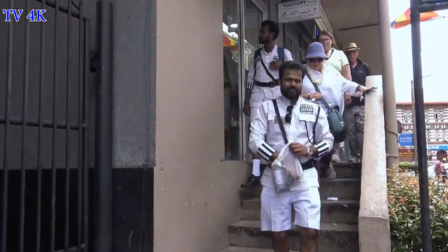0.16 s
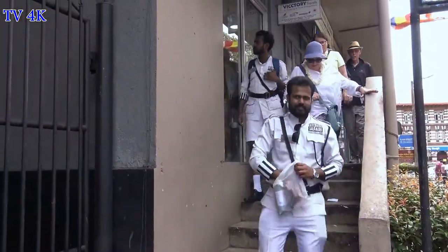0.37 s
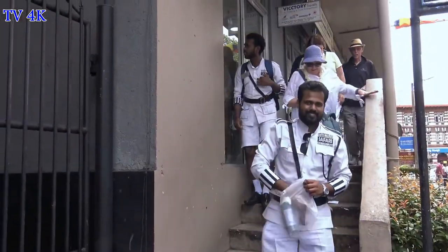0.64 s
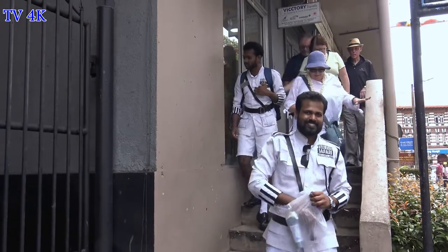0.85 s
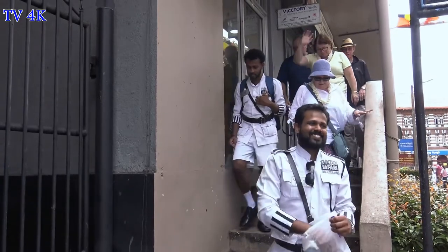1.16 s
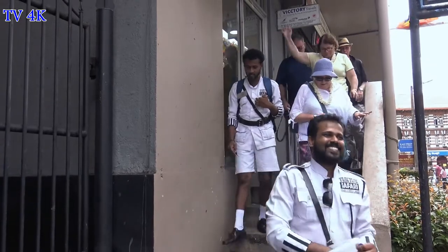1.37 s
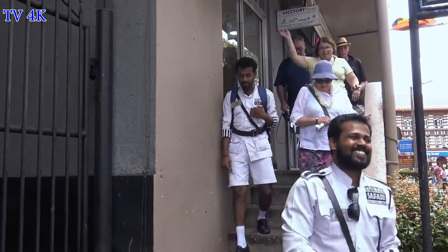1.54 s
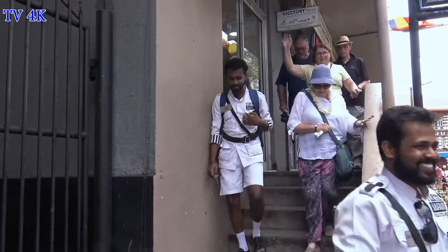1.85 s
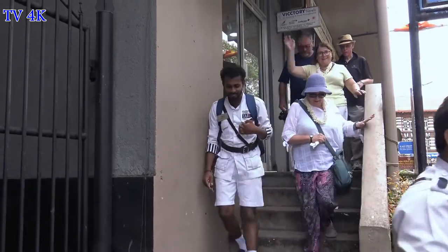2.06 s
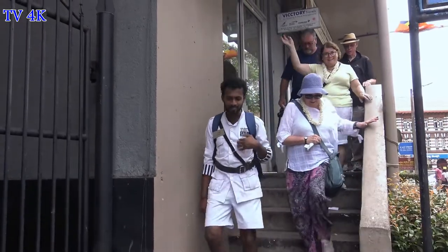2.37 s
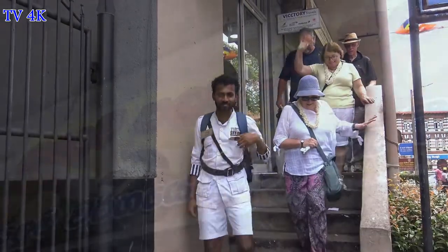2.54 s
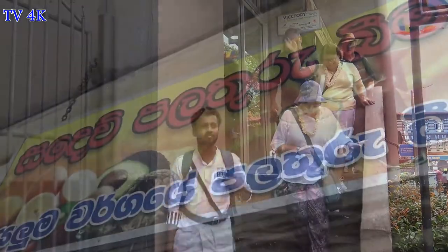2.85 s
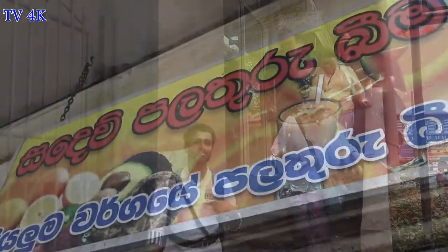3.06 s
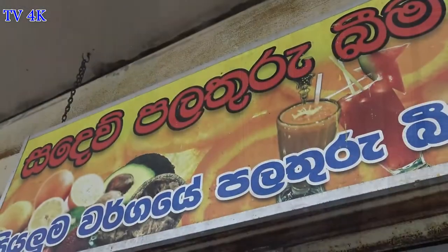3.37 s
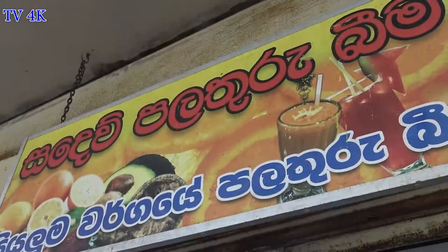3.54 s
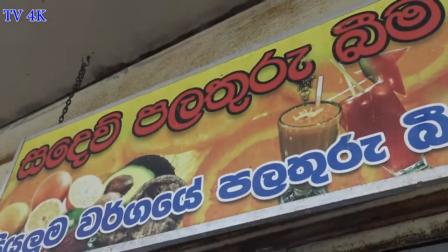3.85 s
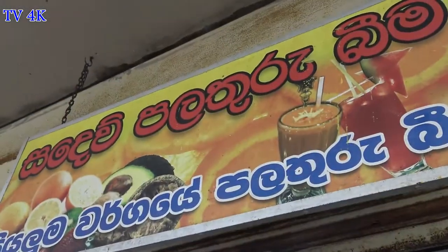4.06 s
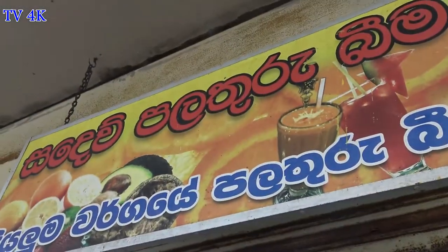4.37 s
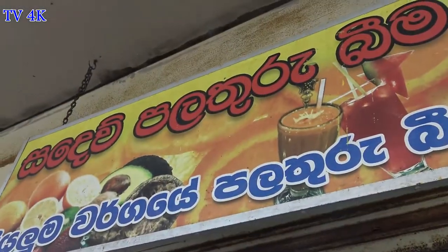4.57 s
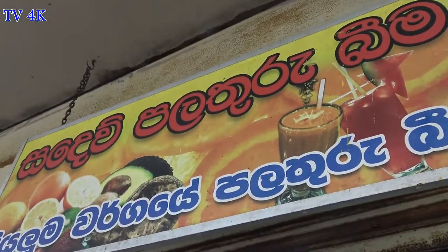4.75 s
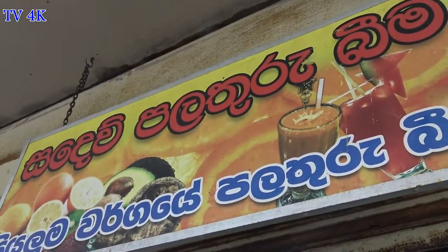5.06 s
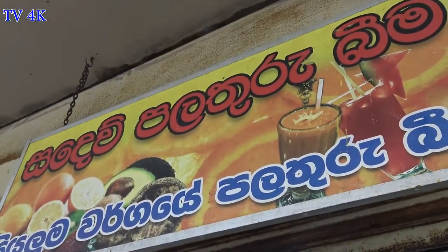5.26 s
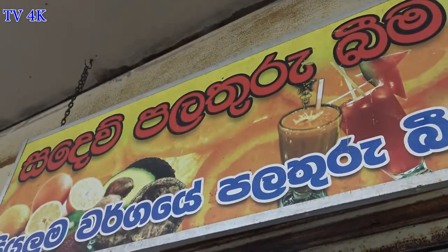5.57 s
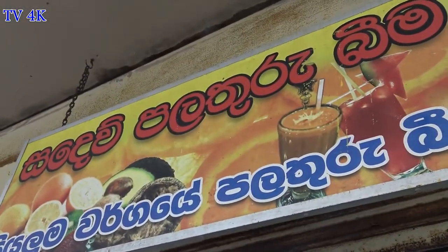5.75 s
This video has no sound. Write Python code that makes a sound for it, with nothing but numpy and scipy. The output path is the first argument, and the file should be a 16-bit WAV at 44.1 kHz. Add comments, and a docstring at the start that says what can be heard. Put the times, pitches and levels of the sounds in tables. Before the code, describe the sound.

Street ambience dominated by one low, booming small engine: stumbling at first, quickly accelerating into fast dull thuds, coasting down after about three seconds, idling weakly, then revving and easing. Late on, another small motor ticks drily at right with a faint rough rising whine. Traffic is a wide, quiet wash in open air, picked up by two spaced microphones.

```python
"""A single-cylinder three-wheeler booms in street traffic while brakes squeal briefly and faintly.
It pulls away, coasts, idles and revs again; each firing rings its silencer as a short tone burst.
Traffic and the rasp of the engine casing are shaped noise, partly alike at two spaced microphones.
Later a second small engine ticks past on the right, made of noise bursts and ringing knocks.
A rough whine climbs as an unsteady tone."""
import sys
import numpy as np
from scipy import signal
from scipy.fft import rfft, irfft, next_fast_len
from scipy.io import wavfile
from scipy.ndimage import uniform_filter1d, map_coordinates

SR = 44100
rng = np.random.default_rng(int(sys.argv[2]) if len(sys.argv) > 2 else 0)


def persist_wave(psi):
    """Save psi, clipped to +-1, as 16-bit WAV."""
    counts = np.round(np.clip(psi, -1, 1) * 32767).astype(np.int16)
    wavfile.write(sys.argv[1], SR, np.atleast_2d(counts).T)


N = 260631  # length in samples


def amp(db):
    """Turn dB into an amplitude factor."""
    return 10 ** (np.asarray(db) / 20)


def unit(x):
    """Scale a signal to an rms of 1."""
    return x / np.sqrt(np.mean(x ** 2) + 1e-20)


def along(points, hz):
    """Read a curve of (Hz, value) points on a log frequency axis."""
    f, v = np.transpose(points)
    return np.interp(np.log(hz + 1), np.log(f + 1), v)


def spectrum(points):
    """A filter whose gain follows (Hz, dB) points."""
    return lambda hz: amp(along(points, hz))


def curves(rows, at=None):
    """Each column after the time, at every sample or at given times."""
    seconds, *columns = np.transpose(rows)
    when = np.arange(N) / SR if at is None else at
    return [np.interp(when, seconds, column) for column in columns]


def wobble(rate):
    """A smooth random curve with `rate` random points a second."""
    knots = rng.standard_normal(int(N * rate / SR) + 4)
    return map_coordinates(knots, [np.arange(N) * rate / SR])


def filtered(x, response):
    """Multiply the spectrum of x by a complex response of frequency."""
    m = next_fast_len(N + SR // 2)
    return irfft(rfft(x, m) * response(np.fft.rfftfreq(m, 1 / SR)), m)[..., :N]


def modes(rows):
    """A filter of a few resonances, given as (Hz, width Hz, dB), with alternating sign."""
    def response(f):
        total = 0
        for k, (centre, width, db) in enumerate(rows):
            damping = 1j * f * width
            total = total + (-1) ** k * amp(db) * damping / (centre ** 2 - f ** 2 + damping)
        return total
    return response


# How alike left and right are. Each row: frequency in Hz, likeness from 0 to 1.
LIKENESS = [(60, 0.97), (260, 0.92), (530, 0.74), (1100, 0.3), (2200, 0.23), (5000, 0.08), (10000, 0.04)]
# How the sound leans to one side. Each row: frequency in Hz, left minus right in dB.
SIDE_LEAN = [(30, .5), (190, 0), (330, 1), (600, 2), (1000, 0), (1800, 2), (3100, -1), (5400, -0.5),
             (8500, -11.5), (10500, -3), (12500, 3)]
LAG_S = 10 / 44100  # the left microphone hears the treble this much later


def spaced(colour, patchy_db):
    """Patchy noise of rms 1 at two microphones: treble less alike, late on the left, mostly leaning right."""
    # random patches in time and frequency are louder or softer
    z = signal.stft(rng.standard_normal((2, N)), nperseg=512)[2]
    patches = uniform_filter1d(rng.standard_normal(z.shape[1:]), 6, 0)
    patches = uniform_filter1d(patches, 10, 1)
    pair = signal.istft(z * amp(patchy_db * unit(patches)), nperseg=512)[1][:, :N]

    # mix a shared and an opposed noise so that the two sides are as alike as the table asks
    def share(hz):
        angle = np.arccos(np.clip(along(LIKENESS, hz), -1, 1)) / 2
        return colour(hz) * np.array([np.cos(angle), np.sin(angle)])

    mid, side = filtered(pair, share)
    ear = np.array([[1], [-1]])  # left, right

    def placing(hz):
        treble_only = 1 / (1 + (1300 / (hz + 1)) ** 4)
        delay = np.exp(-1j * np.pi * hz * LAG_S * ear * treble_only)
        return amp(ear * along(SIDE_LEAN, hz) / 2) * delay

    return unit(filtered(np.array([mid + side, mid - side]), placing))


# Speed of the three-wheeler's engine. Each row: time in seconds, firings per second.
ENGINE_SPEED = [(0.0, 11.39), (0.2, 13.38), (0.42, 9.95), (0.55, 16.49), (0.7, 19.43), (0.85, 23.15),
                (0.97, 19.01), (1.15, 19.14), (1.4, 19.43), (1.62, 19.26), (1.75, 20.1), (2.0, 20.31),
                (2.2, 21.18), (2.45, 21.83), (2.66, 22.22), (2.8, 19.87), (2.95, 17.99), (3.15, 14.3),
                (3.4, 14.17), (3.52, 17.07), (3.68, 10.13), (4.0, 10.35), (4.3, 9.41), (4.5, 9.12),
                (4.62, 9.59), (4.8, 17.11), (4.95, 19.12), (5.1, 19.91), (5.25, 16.15), (5.42, 13.99),
                (5.55, 12.69), (5.66, 16.07), (5.91, 17.61)]
CRANK_START = .262  # firings already counted at 0 s


def firings():
    """The moments at which the running count of firings passes whole numbers."""
    count = CRANK_START + np.cumsum(curves(ENGINE_SPEED)[0]) / SR
    return np.interp(np.arange(1, int(count[-1]) + 1), count, np.arange(N) / SR)


def blend(shut, wide, throttle):
    """A value between its shut-throttle and open-throttle ends."""
    return shut + (wide - shut) * np.clip(throttle, 0, 1)


def puffs(times, hz, ring_s, size, turn=2.7):
    """One tone burst a firing that swells to its peak at the given time and fades; size is its root energy."""
    t = np.arange(-SR // 12, SR // 12) / SR
    spread = ring_s[:, None] * np.where(t < 0, 1.7, 1.45)  # build-up and decay
    swell = np.exp(-.5 * (t / spread) ** 2) * np.hanning(len(t)) ** .5
    burst = swell * np.cos(2 * np.pi * hz[:, None] * t + np.reshape(turn, (-1, 1)))
    burst *= (size / np.linalg.norm(burst, axis=1))[:, None]
    # add the bursts up, with spare room at both ends
    at = (times * SR).astype(int)[:, None] + SR - SR // 12 + np.arange(len(t))
    return np.bincount(at.ravel(), burst.ravel(), N + 3 * SR)[SR:SR + N]


def even_size(times):
    """Slower firing makes bigger puffs, which keeps one average level."""
    return np.sqrt(np.gradient(times) * SR)


# Resonances of the tail pipe. Each row: pitch in Hz before scatter, share of the ring time,
# level in dB, delay in seconds.
TAIL_PIPE_MODES = [(169, 1.3, -4, 0.00034), (200, 0.5, -12, 0.00018), (132, 1.1, -13, .0003)]
PIPE_DB, POP_DB = -17.5, 1  # level against the boom; extra with the throttle shut
# extra gain near the firing rate (per s) that suits the pipe, and how far either side it spreads
PIPE_TUNED_DB, PIPE_TUNED_RATE, PIPE_TUNED_SPREAD = 8.5, 22.14, 1.84
PIPE_IDLE_DB = 6  # the pipe fades as the engine slows: this is the loss towards standstill


def tail_pipe(peak, rate, throttle, ring_s, size, chance):
    """Each firing also rings the tail pipe, most strongly when the firing rate suits it."""
    tuned = np.exp(-.5 * ((rate - PIPE_TUNED_RATE) / PIPE_TUNED_SPREAD) ** 2)
    pipe_db = PIPE_DB + POP_DB * (1 - throttle) + PIPE_TUNED_DB * tuned
    pipe_db = pipe_db - PIPE_IDLE_DB * np.clip(1 - rate / 19, 0, 1) + 5.5 * chance[:, 4]
    out = 0
    for hz, share, db, late_s in TAIL_PIPE_MODES:
        scattered_hz = hz * (1 + .22 * chance[:, 3])
        out = out + puffs(peak + late_s, scattered_hz, share * ring_s, size * amp(pipe_db + db))
    return out


# The driver's throttle and the boom it gives. Each row: time in seconds, boom level in dB before scatter,
# throttle from 0 to 1, boom pitch in Hz before scatter.
THROTTLE_AND_BOOM = [(0, -21, .3, 62), (.07, -22, .1, 67), (.3, -24.5, 0.14, 72), (.48, -20.5, 0.15, 80),
                     (.56, -15.5, 0.8, 84), (.62, -18, 0.75, 95), (.8, -19.5, 0.91, 100.9),
                     (.95, -17.5, 0.86, 92.2), (1.3, -14.5, 0.96, 91.2), (1.6, -15.5, 0.83, 90),
                     (1.7, -12.5, 0.9, 93.2), (1.95, -13.5, 0.93, 90.8), (2.4, -15, 0.96, 102.8),
                     (2.725, -17, 0.74, 100), (2.76, -15, .25, 80), (2.87, -15, .25, 80),
                     (3.0, -19, .2, 73), (3.12, -21, .25, 70), (3.45, -23.5, 0.1, 79),
                     (3.58, -21, 0.33, 74.6), (3.7, -26, 0.25, 70), (4.5, -25.5, 0, 73.5),
                     (4.66, -21, .1, 82), (4.74, -16, 0.6, 77), (4.81, -20, 0.9, 98), (5.08, -14.5, 1, 96),
                     (5.2, -17, 0.64, 81), (5.3, -18.5, 0.2, 69.5), (5.37, -20.5, 0.35, 86),
                     (5.45, -21, 0.27, 74), (5.62, -14, 0.8, 81.5), (5.72, -20.5, .6, 88),
                     (5.91, -18.5, 0.6, 86)]
# Weak firings as the engine stumbles. Each row: time in seconds, loss of the nearest firing in dB.
WEAK_FIRINGS = [(.15, 10), (.39, 2), (2.926, 6.5), (3.175, 2), (3.31, 4), (3.51, 10), (3.65, 1), (3.745, 3),
                (4.04, 14), (4.235, 8), (4.56, 16), (5.12, 11), (5.44, 2.5), (5.495, 3)]
IDLE_RING_S, LOADED_RING_S = .0052, .0098  # basic burst width, scaled later for build-up and decay
IDLE_UNEVEN, LOADED_UNEVEN = .28, .11  # how strongly firings differ, scaling all the scatter
SCATTER_DB = 5  # size scatter for an unevenness of 1
# where in its swing the boom peaks (radians): suction first when shut, pressure first under load
IDLE_TURN, LOADED_TURN = -1.0, -3.58
CHAMBER_DB = -12  # a deeper chamber, against the boom
# off load and below this firing rate (per s), a weaker puff follows each firing
AFTER_S, AFTER_DB, AFTER_BELOW_RATE = .026, -6, 21


def exhaust(times):
    """Each firing rings the silencer and tail pipe; uneven burning scatters time, size and pitch."""
    boom_db, throttle, hz = curves(THROTTLE_AND_BOOM, times)
    rate, = curves(ENGINE_SPEED, times)
    ring_s = blend(IDLE_RING_S, LOADED_RING_S, throttle)
    load = np.clip(throttle, 0, 1)
    uneven = blend(IDLE_UNEVEN, LOADED_UNEVEN, 1 - (1 - load) ** 3)
    chance = rng.standard_normal((len(times), 5)) * uneven[:, None]
    for s, loss_db in WEAK_FIRINGS:
        boom_db[np.argmin(abs(times - s))] -= loss_db
    size = amp(boom_db + SCATTER_DB * chance[:, 0]) * even_size(times)
    turn = blend(IDLE_TURN, LOADED_TURN, load ** 3)
    peak = times + .0034 + .005 * chance[:, 1]

    boom = puffs(peak, hz * (1 + .14 * chance[:, 2]), ring_s, size, turn)
    chamber = puffs(peak + .0045, .62 * hz, .8 * ring_s, size * amp(CHAMBER_DB), turn)
    pipe = tail_pipe(peak, rate, throttle, ring_s, size, chance)

    after_peak = peak + AFTER_S * (1 + chance[:, 4])
    after_hz = hz * (1 + .32 * chance[:, 3])
    after_share = np.clip((1 - throttle) * (AFTER_BELOW_RATE - rate) / 6, 0, 1)
    after = puffs(after_peak, after_hz, 1.46 * ring_s, size * amp(AFTER_DB) * after_share, turn)
    return boom + chamber + after + pipe


# Level of the traffic rumble. Each row: time in seconds, level in dB before its wobble.
RUMBLE_LEVEL = [(0, -22), (.6, -24.5), (.9, -29), (1.5, -30), (2.6, -30.5), (3.0, -22), (3.35, -24),
                (3.7, -26.5), (4.6, -24.5), (5.0, -24), (5.91, -22)]
# Tone colour of the rumble. Each row: frequency in Hz, relative level in dB per Hz.
RUMBLE_COLOUR = [(8, -16), (22, -5.5), (33, 0.5), (52, -2), (75, -4), (110, -3.5), (200, -33), (400, -89)]


def traffic_rumble():
    """Deep noise from the traffic, with a slowly wobbling level."""
    level = amp(curves(RUMBLE_LEVEL)[0] + 2.3 * wobble(6.7))
    return level * spaced(spectrum(RUMBLE_COLOUR), patchy_db=2.5)


# Level of the traffic. Each row: time in seconds, roar level and tyre hiss level in dB before their wobble.
TRAFFIC_LEVEL = [(0, -40.5, -50), (.1, -39, -51), (.23, -37.5, -52), (.3, -44, -52.5), (.6, -39.5, -52),
                 (.8, -39, -51), (.87, -38, -45), (.93, -39, -51), (1.2, -40, -53), (1.6, -40.5, -50.5),
                 (1.9, -37.5, -54), (2.6, -38, -47.5), (3.0, -44.5, -51.5), (3.25, -40.5, -48),
                 (3.4, -39.5, -49.5), (3.6, -43.5, -49), (4.55, -42, -48), (4.68, -36, -46.5),
                 (5.35, -40, -49), (5.6, -38, -53), (5.91, -43.5, -50.5)]
# Tone colour of the roar. Each row: frequency in Hz, relative level in dB per Hz.
ROAR_COLOUR = [(88, -30.5), (150, 0), (300, 2), (414, -5.5), (439, -8.5), (878, -6.5), (1040, -12),
               (1360, -17), (1480, -14.5), (2600, -19.5), (3380, -28), (5720, -120)]
# Tone colour of the tyre hiss. Each row: frequency in Hz, relative level in dB per Hz.
HISS_COLOUR = [(900, -48), (1500, -1.5), (1900, 2), (2600, -3.5), (4000, -1), (5300, -4.5), (6500, -2.5),
               (7900, -2.5), (9300, -5.5), (10200, -16), (11000, -64)]


def traffic_roar_and_tyres():
    """Mid-range roar and brighter tyre hiss, two noises that share one random swell."""
    roar_db, hiss_db = curves(TRAFFIC_LEVEL)
    swell = wobble(8.9)
    roar = amp(roar_db + .17 * swell) * spaced(spectrum(ROAR_COLOUR), patchy_db=2.0)
    hiss_level = amp(hiss_db + .8 * swell + 1.5 * wobble(16))
    return roar + hiss_level * spaced(spectrum(HISS_COLOUR), patchy_db=1.5)


# Level of a very faint hiss above 10 kHz, silent from 1.0 to 2.18 s.
# Each row: time in seconds, level in dB before its wobble.
FAINT_HISS_LEVEL = [(0, -63), (.85, -68), (1.0, -110), (2.18, -110), (2.3, -68.5), (2.9, -62.5), (4.7, -60),
                    (5.91, -72)]
# Tone colour of that hiss. Each row: frequency in Hz, relative level in dB per Hz.
FAINT_HISS_COLOUR = [(9000, -66.5), (10300, -14.5), (11500, -19), (14800, -22.5), (15700, -27.5)]


def faint_high_hiss():
    """Very faint noise above 10 kHz, with a wobbling level that follows the table."""
    level = amp(curves(FAINT_HISS_LEVEL)[0] + 1.8 * wobble(12))
    return level * spaced(spectrum(FAINT_HISS_COLOUR), patchy_db=4)


def strokes(times, rise_s, floor):
    """A level curve of rms 1 that swells after each firing over a steady floor."""
    t = np.arange(SR // 10) / SR
    at = np.clip(times * SR, 0, N - 1).astype(int)
    hits = np.bincount(at, amp(rng.normal(0, 1.5, len(times))), N)
    swell = signal.fftconvolve(hits, t / rise_s * np.exp(1 - t / rise_s))[:N]
    return unit(floor + swell)


# Rasp of the engine casing, loudest in the hard pull. Each row: time in seconds, level in dB.
RASP_LEVEL = [(0, -44), (.5, -48.5), (.75, -42.5), (1.0, -47), (1.65, -46.5), (1.8, -40), (2.62, -44),
              (2.75, -48), (3.5, -49), (4.55, -46.5), (4.75, -48), (5.35, -44), (5.91, -54.5)]
# Resonances of the casing. Each row: frequency in Hz, width in Hz, level in dB.
CASING_MODES = [(753, 56, 10.5), (1306, 165, 7.5), (1040, 58, 4), (4050, 5300, -24.5), (7820, 1330, -8.5)]


def casing_rasp(times):
    """Noise through the resonances of the engine casing, swelling once a firing."""
    casing = modes(CASING_MODES)
    noise = spaced(lambda hz: casing(hz) / (1 + (hz / 9800) ** 20), patchy_db=1.34)
    # the floor is the part of the rasp that never stops
    return amp(curves(RASP_LEVEL)[0]) * strokes(times, rise_s=.007, floor=.45) * noise


# Brake squeals. Each row: start in seconds, end in seconds, pitch in Hz and level in dB before their
# wobble, left minus right in dB.
BRAKE_SQUEALS = [(0, .11, 7800, -53, 0), (0, .19, 4380, -59, 0), (3.06, 3.54, 12300, -71, 8)]


def brakes():
    """Each squeal is a thin, high tone whose pitch and level tremble."""
    t = np.arange(N) / SR
    out = np.zeros((2, N))
    for start, end, hz, db, pan_db in BRAKE_SQUEALS:
        fade = np.clip(np.minimum((t - start + .011) / .012, (end - t) / .045), 0, 1)
        tone = np.sin(2 * np.pi * np.cumsum(hz * (1 + .005 * wobble(300))) / SR)
        out += fade * amp(db + 2.2 * wobble(40)) * tone * amp([[pan_db / 2], [-pan_db / 2]])
    return out


# The chassis rocks once a firing. Each row: time in seconds, level in dB before a 5 dB cut.
ROCKING_LEVEL = [(0, -53), (.8, -50), (.88, -17), (1.02, -17.5), (1.2, -24), (1.5, -33), (1.8, -25.5),
                 (2.6, -24.5), (2.8, -41), (4.8, -46), (4.92, -18), (5.05, -25), (5.25, -35), (5.91, -43)]


def chassis_rocking(times):
    """A very deep push after each firing, swinging at the firing rate itself."""
    rate, = curves(ENGINE_SPEED, times)
    size = amp(curves(ROCKING_LEVEL, times)[0] - 5) * even_size(times)
    return puffs(times + .23 / rate, rate, .5 / rate, size)


# Strokes of the second engine. Each row: start in seconds, hiss level in dB and knock level in dB,
# both before their fade-in and decay.
SECOND_ENGINE_TICKS = [(2.83, -52, -33), (3.05, -52, -32), (4.463, -50, -37), (4.5214, -48, -33),
                       (4.585, -50, -40), (4.642, -49, -33), (4.689, -42.5, -33), (4.7474, -50, -33),
                       (4.796, -42, -28), (4.8594, -46, -39), (4.9157, -40.5, -34), (4.9688, -38, -33),
                       (5.032, -38, -29), (5.0933, -40, -34), (5.1494, -47.5, -36), (5.226, -44.5, -45),
                       (5.2977, -47, -28), (5.3694, -43, -30), (5.4194, -45, -42), (5.49, -47, -43),
                       (5.5622, -44, -42), (5.633, -41, -35), (5.705, -44, -39), (5.777, -46, -46),
                       (5.848, -43, -39)]
# Tone colour of its hiss. Each row: frequency in Hz, relative level in dB per Hz.
TICK_HISS_COLOUR = [(1200, -45), (1800, -8), (4000, -9), (6000, -8), (8200, -5), (9800, -4), (11000, -24.5),
                    (15500, -29)]
# Resonances of its exhaust rasp. Each row: frequency in Hz, width in Hz, level in dB.
GROWL_MODES = [(820, 160, -0.5), (1180, 310, 0), (1840, 840, -4)]
# Resonances of its casing. Each row: pitch in Hz before a small scatter, level in dB.
KNOCK_MODES = [(1185, 0), (1400, -6), (840, -7)]
GROWL_DB = -8  # exhaust rasp against the knock
HISS_T60, GROWL_T60, KNOCK_T60 = .16, .14, .09  # s for the decay to fall by 60 dB


def second_engine():
    """Each stroke is a burst of hiss, a rasping puff and a short casing knock, from the right."""
    out = np.zeros((2, N + SR))
    t = np.arange(SR // 10) / SR
    hiss = spaced(spectrum(TICK_HISS_COLOUR), patchy_db=2.2)
    growl = spaced(modes(GROWL_MODES), patchy_db=3.5)
    chances = rng.standard_normal((len(SECOND_ENGINE_TICKS), 2, len(KNOCK_MODES)))
    for (s, hiss_db, knock_db), chance in zip(SECOND_ENGINE_TICKS, chances):
        k = round(s * SR)
        burst = amp(hiss_db - 60 * t / HISS_T60) * (1 - np.exp(-t / .007))
        puff = amp(knock_db + GROWL_DB - 60 * t / GROWL_T60) * np.sin(np.pi * t / t[-1]) ** .38
        noise = hiss[:, k:k + len(t)] * burst[:N - k] + growl[:, k:k + len(t)] * puff[:N - k]
        out[:, k:min(k + len(t), N)] += noise

        knock = amp(knock_db - 60 * t / KNOCK_T60) * (1 - np.exp(-t / .0038))
        ear_time = t - [[.00012], [0]]  # the knock's ringing runs later on the left
        for (hz, mode_db), turn, detune in zip(KNOCK_MODES, *chance):
            ring = np.sin(2 * np.pi * hz * (1 + .02 * detune) * ear_time + np.pi * turn)
            out[:, k:k + len(t)] += knock * amp(mode_db) * ring
    return out[:, :N]


# A rough whine that climbs. Each row: time in seconds, pitch in Hz and level in dB before their wobble.
WHINE = [(3.95, 975, -54), (4.14, 995, -48), (4.2, 1005, -44), (4.3, 1000, -45), (4.36, 975, -45),
         (4.5, 1005, -48), (4.68, 990, -44.5), (4.76, 985, -46), (4.88, 1005, -50), (4.96, 1025, -43.5),
         (5.15, 1030, -43.5), (5.2, 1075, -46), (5.3, 1110, -45), (5.4, 1130, -48)]


def rough_whine():
    """One tone a side, each with its own fast random wobble of pitch and level."""
    t = np.arange(N) / SR
    hz, db = curves(WHINE)
    on = (t > WHINE[0][0]) & (t < WHINE[-1][0])
    sides = []
    for turn in (0, .9):  # starting phase in radians, left then right
        level = amp(db + 3 * wobble(25))
        phase = 2 * np.pi * np.cumsum(hz + 19 * wobble(50)) / SR
        sides.append(on * level * np.sin(phase + turn))
    return np.array(sides)


def scene():
    """All the sources, added together."""
    times = firings()
    three_wheeler = exhaust(times) + casing_rasp(times) + chassis_rocking(times)
    background = traffic_rumble() + traffic_roar_and_tyres() + faint_high_hiss()
    return three_wheeler + background + brakes() + second_engine() + rough_whine()


TOP_HZ = 15750  # band limit


def record(dry):
    """Keep nothing at or above the band limit."""
    return filtered(dry, lambda hz: hz < TOP_HZ)


dry = scene()
out = record(dry)
persist_wave(out)
```